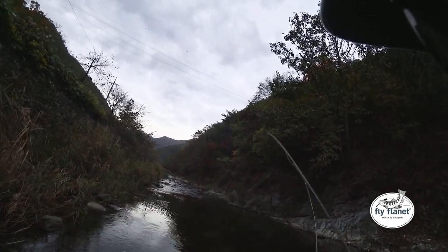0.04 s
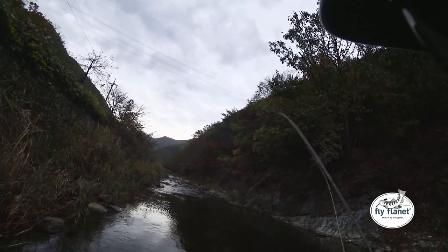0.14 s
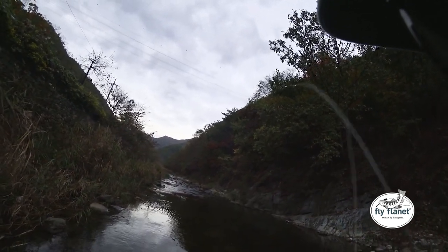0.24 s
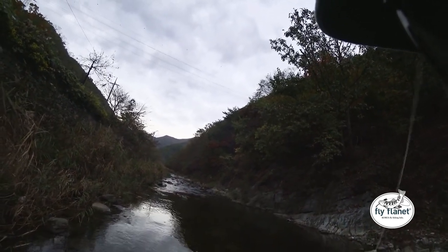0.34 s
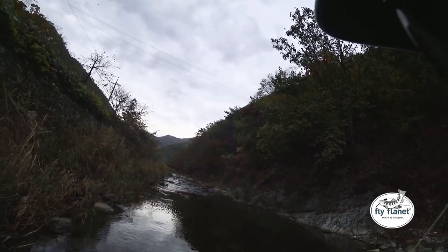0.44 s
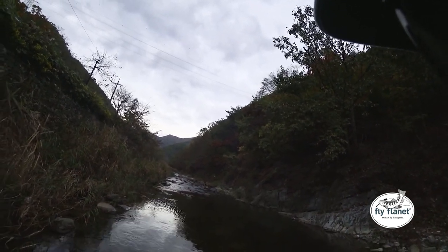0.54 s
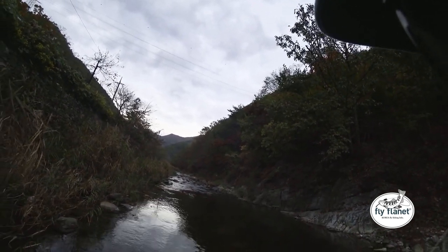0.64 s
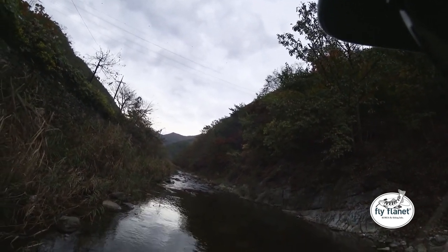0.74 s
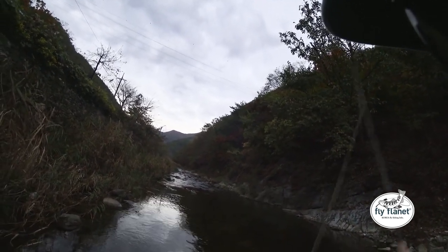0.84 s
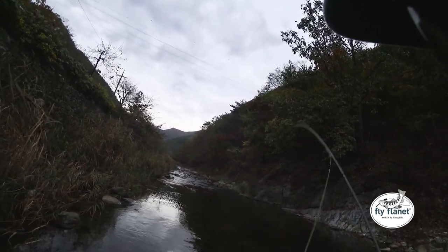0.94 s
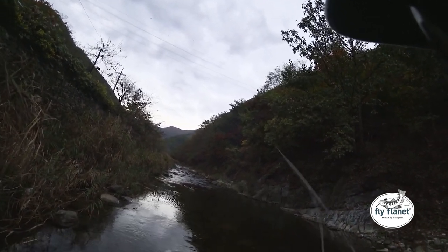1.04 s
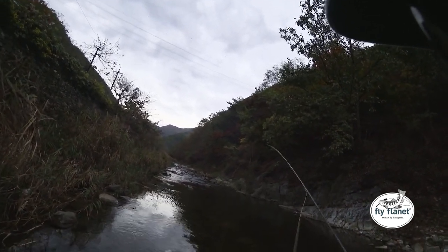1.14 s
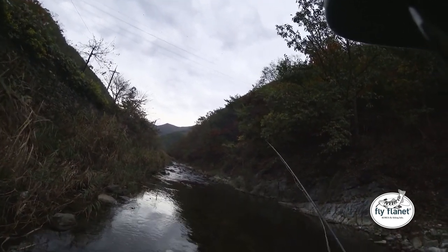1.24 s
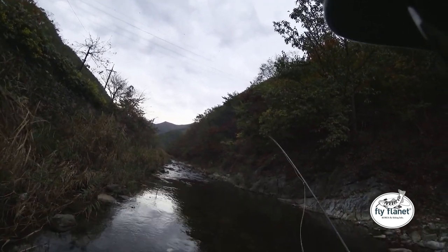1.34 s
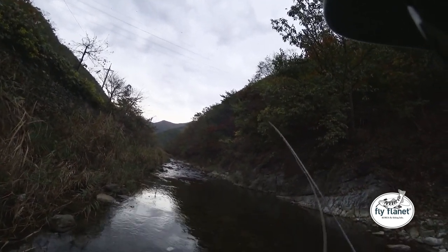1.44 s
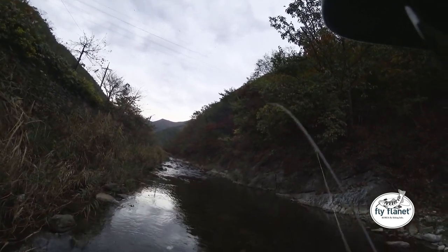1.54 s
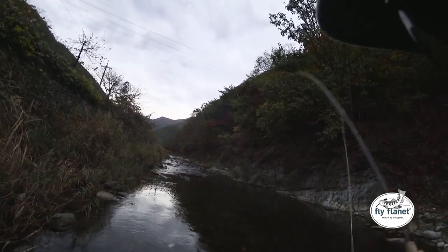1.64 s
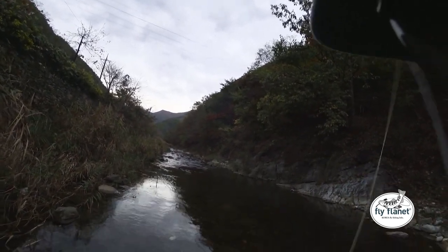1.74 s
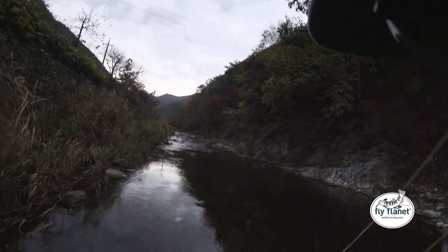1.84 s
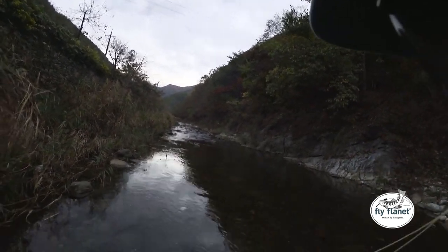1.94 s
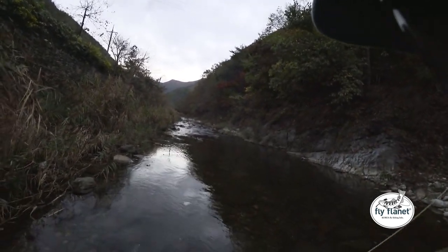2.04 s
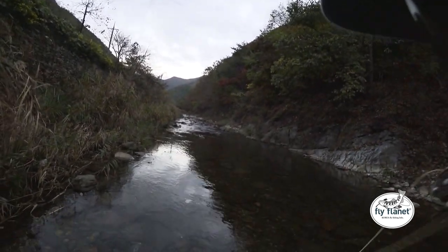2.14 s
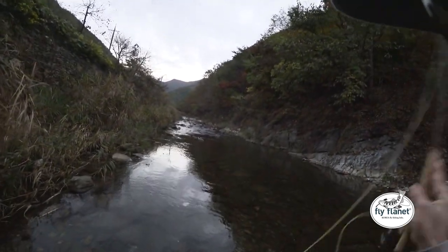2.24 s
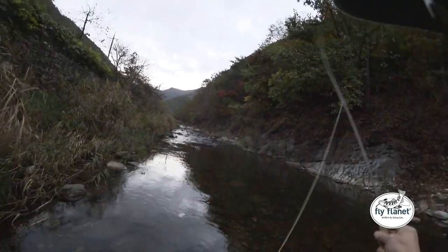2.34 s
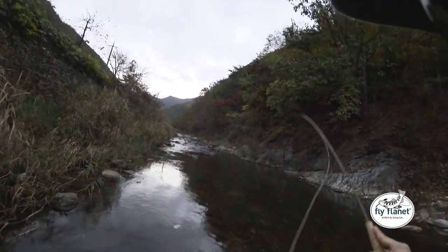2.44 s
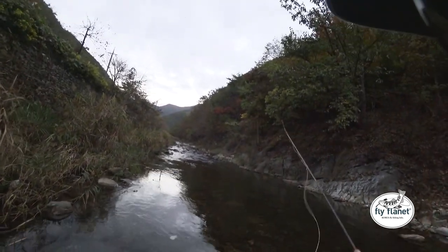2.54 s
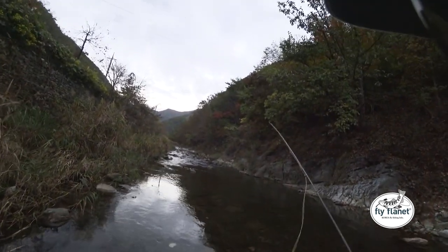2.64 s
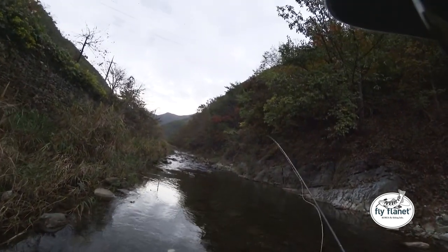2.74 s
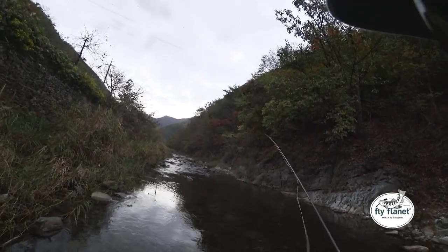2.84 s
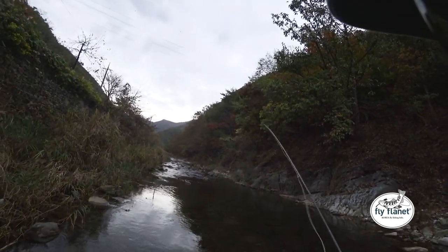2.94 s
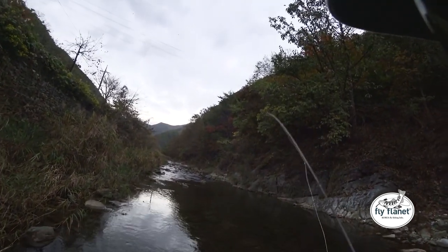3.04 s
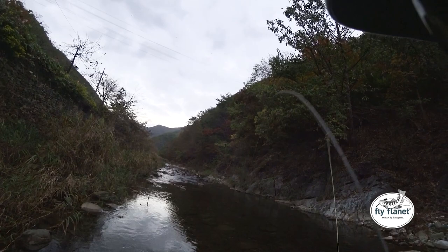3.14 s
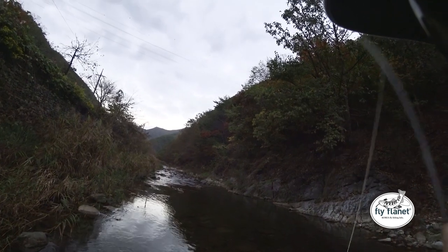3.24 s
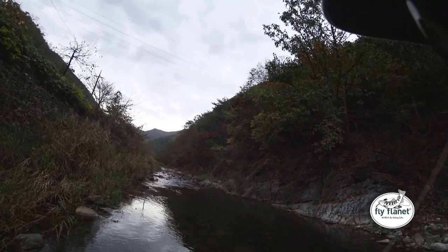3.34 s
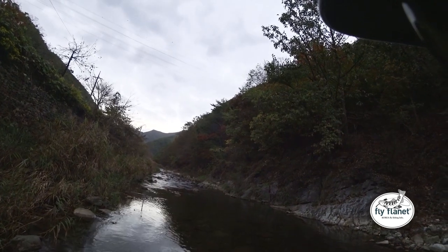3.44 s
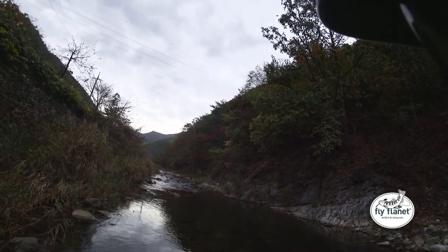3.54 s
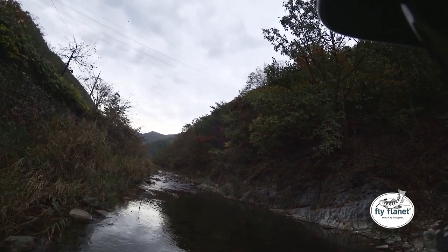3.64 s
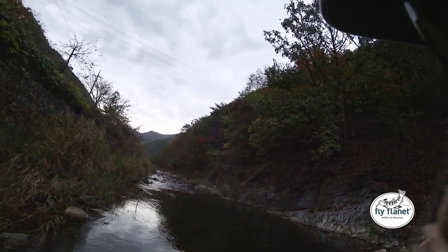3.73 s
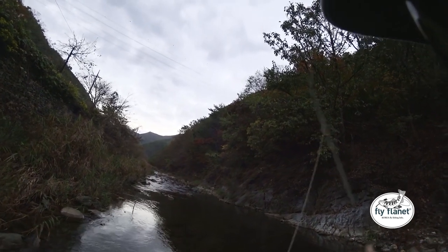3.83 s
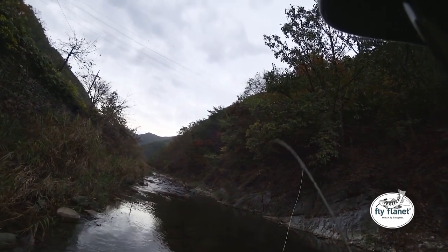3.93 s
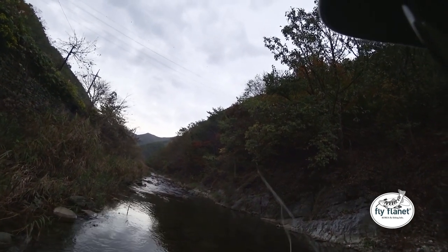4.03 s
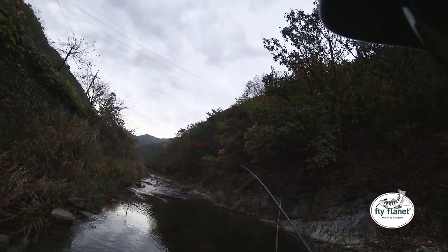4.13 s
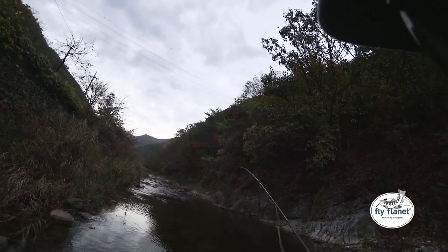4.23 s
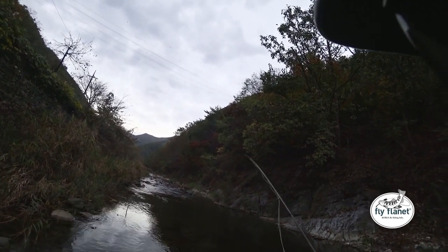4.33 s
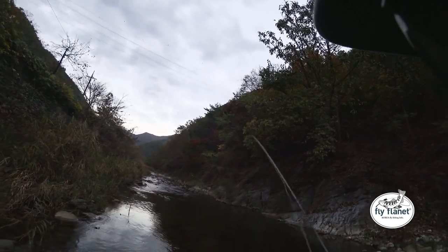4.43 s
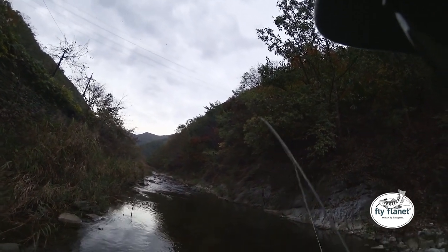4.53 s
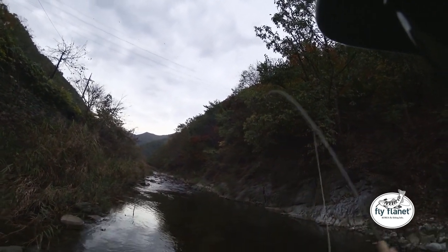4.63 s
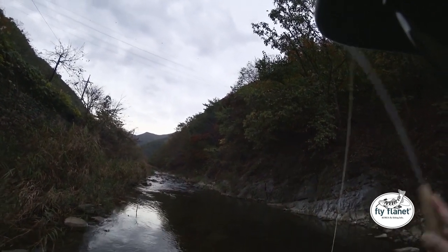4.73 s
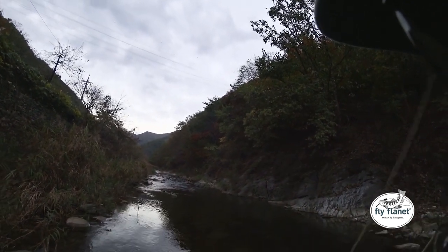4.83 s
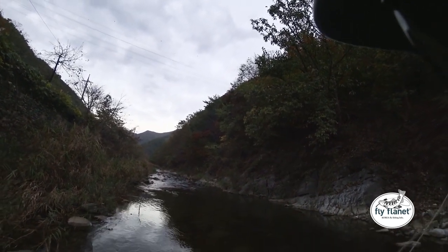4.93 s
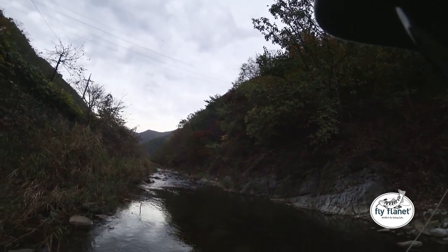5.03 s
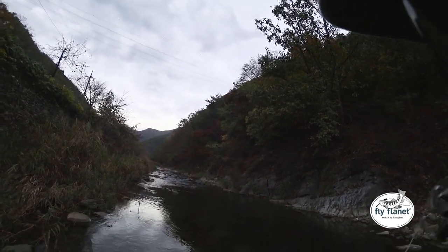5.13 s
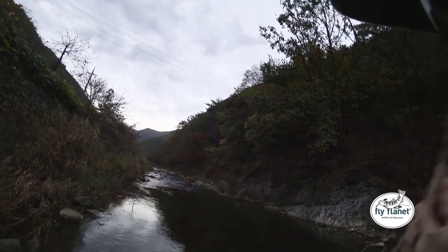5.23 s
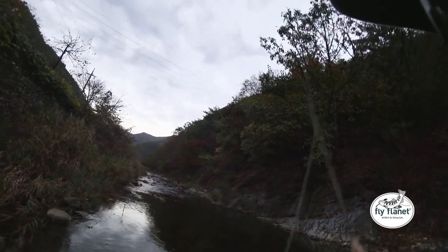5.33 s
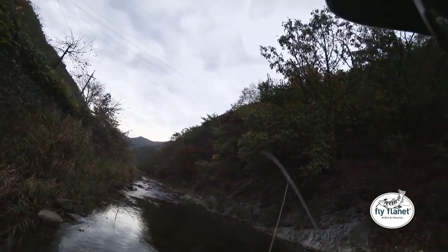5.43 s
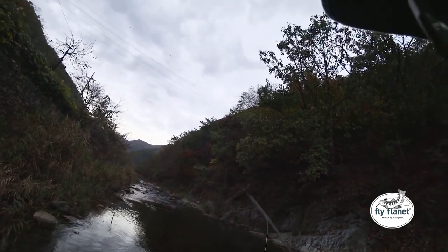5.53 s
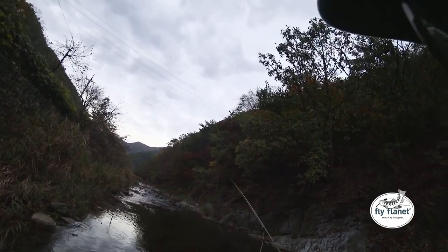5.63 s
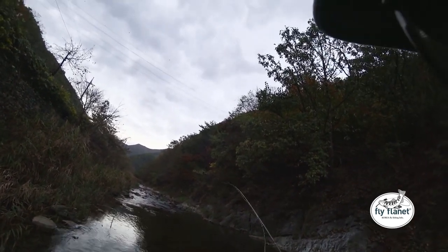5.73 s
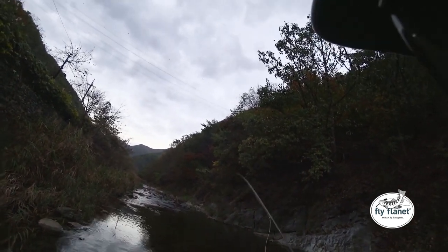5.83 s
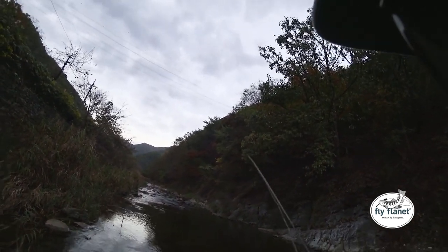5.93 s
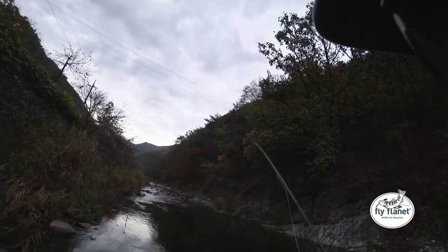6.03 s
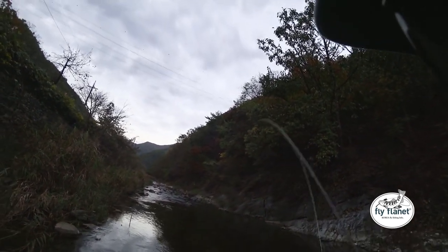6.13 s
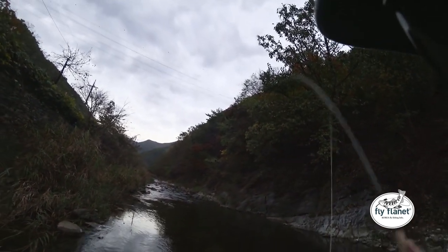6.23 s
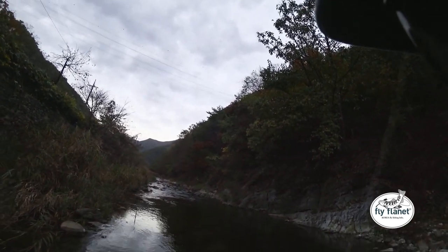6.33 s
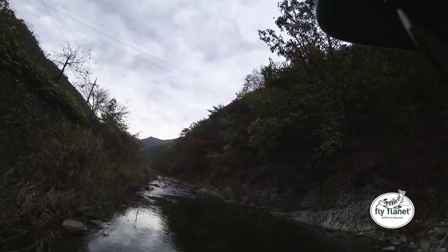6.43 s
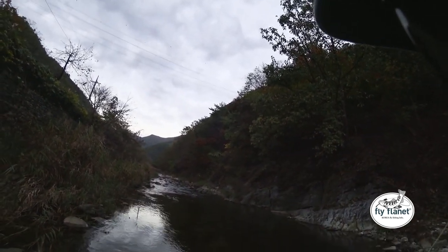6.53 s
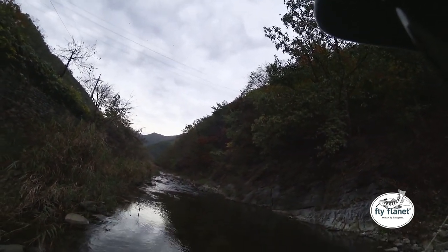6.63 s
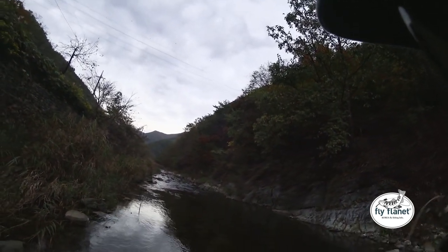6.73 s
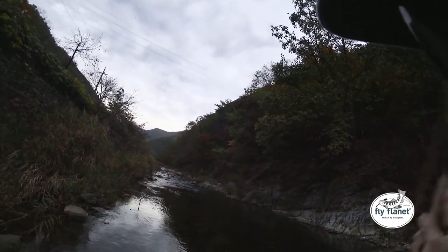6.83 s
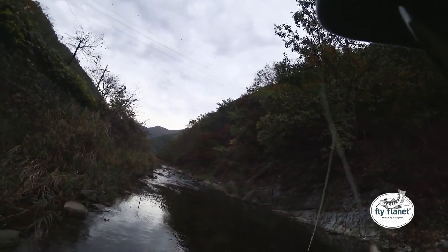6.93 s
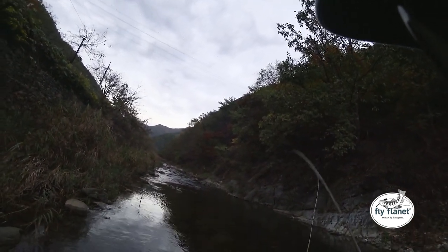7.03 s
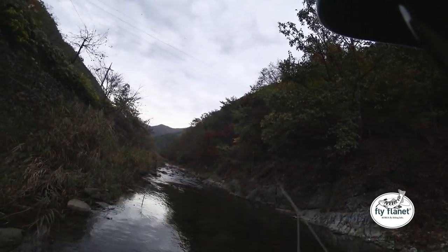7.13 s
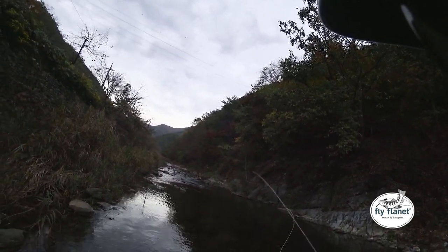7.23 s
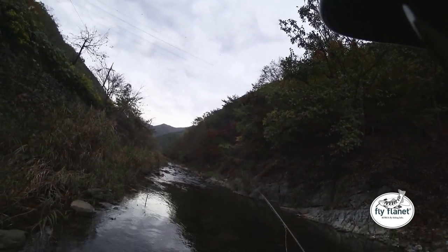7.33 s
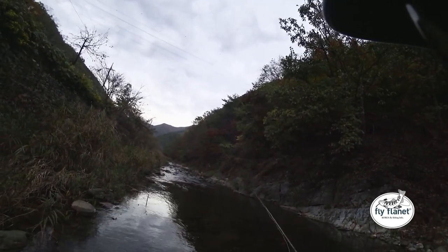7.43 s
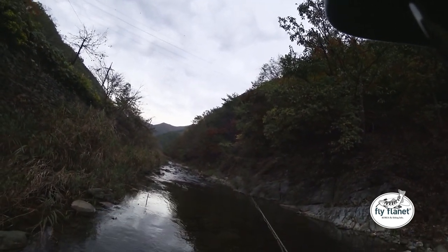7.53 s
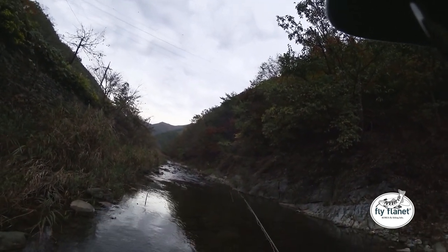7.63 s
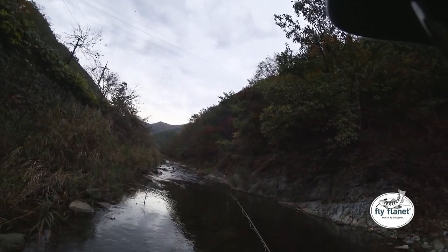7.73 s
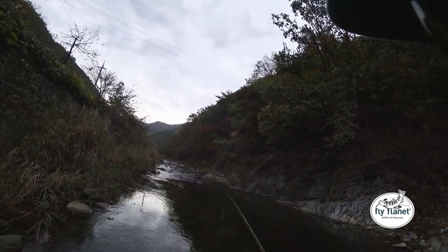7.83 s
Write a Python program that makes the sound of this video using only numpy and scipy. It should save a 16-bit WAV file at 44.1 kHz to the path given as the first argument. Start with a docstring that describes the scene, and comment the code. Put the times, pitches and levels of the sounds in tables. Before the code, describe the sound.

Five short ratcheting buzzes from a fly reel, each slowing into single clicks, over a shallow stream's steady rush and soft line hiss.

```python
"""A shallow stream rushes and bubbles while fishing line hisses through rod rings; then a fly reel buzzes.
An angler pulls line off the reel five times while casting: each pull spins the spool, whose pawl drops
once a ratchet tooth, and the buzz runs out in single clicks. The line also whistles as it sheds eddies
in the air and ticks on the rod. Stirred water gurgles with decaying sine bubbles; soft bumps are low noise."""
import sys
import numpy as np
from scipy import signal
from scipy.fft import rfft, irfft, next_fast_len
from scipy.io import wavfile

SR = 44100
rng = np.random.default_rng(int(sys.argv[2]) if len(sys.argv) > 2 else 0)


def to_wav(sig):
    """Store sig (one row per channel, or 1-D mono) as 16-bit WAV at the path in sys.argv[1].

    Samples outside -1..1 are clipped; the rate is SR.
    """
    pcm = np.clip(np.atleast_2d(sig), -1, 1) * 32767
    pcm = np.round(pcm).astype(np.int16)
    wavfile.write(sys.argv[1], SR, pcm.T)  # frames by channels


N = 347067
TIME = np.arange(N) / SR

# Levels in the tables are relative: each source's own level_db, where it has one, adds to them.
# spectrum of the stream's rush: frequency_hz, density_db (per Hz)
STREAM_SPECTRUM = [(25, -44), (70, -46), (160, -33.5), (250, -17), (350, -10), (550, -7), (1200, -3),
                   (1800, -7), (2700, -12), (4000, -12.5), (6000, -26.5), (8500, -18.5), (11000, -27)]
# left-right likeness of the rush: frequency_hz, likeness (1 = identical)
STREAM_LIKENESS = [(60, 0.29), (300, 0.84), (600, 0.77), (1200, 0.69), (2600, 0.44), (6000, 1),
                   (11000, 0.47)]
# line sliding through the rings, long on each forward cast, briefly on the back cast:
# middle_s, half_length_s, level_db
LINE_SLIDES = [(0.08, 0.21, -54), (1.13, 0.31, -46.5), (1.75, 0.18, -49.5), (2.6, 0.29, -45),
               (4.15, 0.3, -45.5), (5.61, 0.38, -47.5), (6.2, 0.16, -56), (7.18, 0.37, -47),
               (7.82, 0.054, -52)]
# spectrum of the sliding hiss: frequency_hz, level_db
SLIDE_SPECTRUM = [(1200, -36.5), (1900, -5.5), (3000, -16.5), (4000, -9), (5100, -4.5), (5700, -0.5),
                  (7000, -2), (8000, -9.5), (9000, -17.5), (9800, -13), (11000, -18.5)]
# soft bumps of the body moving: middle_s, half_length_s, level_db
BODY_BUMPS = [(0.28, 0.032, -79), (2.17, 0.14, -68.5), (2.57, 0.18, -63), (3.1, 0.049, -77),
              (4.13, 0.066, -78), (4.68, 0.037, -70), (5.16, 0.17, -79), (6.63, 0.05, -75),
              (7.03, 0.033, -65)]
# pulls on the line: start_s, fastest_s, end_s, first_teeth_per_s, top_teeth_per_s, coasting_teeth_per_s,
# tug_abruptness (exponent), slowing_s, driven_click_db, coasting_click_db, knock_db,
# driven_chatter_hz, coasting_chatter_hz
LINE_PULLS = [(0.301, 0.432, 0.5864, 163, 346, 91, 2.73, 0.13, -14, -12.5, 4, 5650, 6300),
              (1.744, 1.87, 2.0151, 180, 375, 80, 3.2, 0.12, -12, -16, 4.5, 6450, 4800),
              (3.176, 3.35, 3.5647, 157, 342, 67, 2.13, 0.173, -13.5, -10.5, 2.5, 5920, 6900),
              (4.6674, 4.836, 5.0031, 139, 359, 94, 1.25, 0.141, -12.5, -10.5, 4, 6342, 4370),
              (6.173, 6.38, 6.5952, 98, 333, 109.5, 1.52, 0.16, -12.5, -13.5, 4.5, 6120, 8583)]
# single teeth as the spool creeps: time_s, click_db
LONE_TEETH = [(0.599, -13), (0.6155, -14.5), (0.6446, -13), (2.0285, -13), (2.0443, -13), (2.0627, -15.5),
              (2.0933, -14.5), (3.0645, -20), (3.0795, -19), (3.0934, -18.5), (3.1093, -21), (3.1411, -18),
              (3.5751, -11), (3.5884, -9), (3.6063, -10.5), (5.0158, -14), (5.029, -7), (5.0428, -11.5),
              (5.0565, -11), (5.071, -10), (5.0901, -14), (5.1392, -10.5), (6.6045, -14), (6.6161, -11),
              (6.6302, -13.5), (6.6567, -13)]
# broad spectrum of the reel: frequency_hz, level_db
REEL_SPECTRUM = [(200, -72), (450, -30), (1000, -14.5), (1600, -5), (1850, -11), (2600, -6), (3000, -11.5),
                 (3350, -18.5), (3700, -8), (4200, -7.5), (5000, -2.5), (6300, -3.5), (8400, 0),
                 (11000, -5)]
# ringing of spool and frame: frequency_hz, width_hz, level_db
REEL_MODES = [(2453, 100, -2), (3703, 79, 3), (4590, 250, -5.5), (5410, 49, 5.5), (6270, 190, -7.5),
              (9600, 330, 2.5)]
# the reel is held to the left: frequency_hz, right_ear_level_db
REEL_SHADOW = [(500, 4), (1200, -10.5), (2200, -5), (4000, -9.5), (7000, -7), (11000, -6)]
# phase between the reel's two sides: frequency_hz, right_lead_rad
EAR_PHASE = [(300, -0.9), (1400, 0.79), (3500, -0.63), (6500, 0.26), (11000, -1.68)]
# water stirred nearby: middle_s, half_length_s, level_db
SLOSHES = [(0.59, 0.37, -46), (0.87, 0.19, -48), (1.89, 0.13, -42), (2.21, 0.21, -44), (2.56, 0.37, -47.5),
           (6.18, 0.085, -48), (6.43, 0.22, -44)]
# big bubbles: start_s, pitch_hz, level_db
BIG_BUBBLES = [(0.65, 780, -34.5), (0.925, 463, -33.5), (0.94, 563, -31.5), (1.845, 594, -31),
               (1.905, 560, -32), (2.15, 796, -32), (2.222, 847, -35), (2.505, 537, -36), (2.6, 590, -35.5),
               (6.325, 390, -43)]
# line swishing through the air: start_s, length_s, first_hz, last_hz, level_db,
# blur_width (share of last_hz), octave_db
SWISHES = [(0.658, 0.26, 3430, 4890, -56.5, 0.18, -18), (4.567, 0.12, 3120, 4030, -46, 0.024, -10),
           (5.69, 0.37, 3440, 5190, -53, 0.12, -31), (6.678, 0.25, 3190, 5150, -45, 0.12, -26),
           (7.67, 0.19, 2955, 5750, -45.5, 0.08, -27), (7.81, 0.13, 3670, 4620, -42, 0.093, -18)]
# line tapping the rod: start_s, peak_db
LINE_TAPS = [(1.1772, -32), (1.479, -27), (1.6644, -32), (2.6777, -27.5), (2.709, -24), (3.743, -29),
             (3.812, -34), (4.273, -27), (5.7137, -28.5)]

WOBBLE_S, WOBBLES_PER_S = 0.00005, 25  # uneven spool: s early or late, changes per s
CHATTER_WANDER, WANDERS_PER_S = 0.093, 4.7  # chatter pitch strays: share, changes per s
KNOCK_RISE_DB, COASTING_KNOCK_DB = 6, 1  # knock grows while spinning up, and again while coasting
CUTOFF_HZ = 11100


def from_db(db):
    """Amplitude gain is ten to the power of decibels over twenty."""
    return 10 ** (np.asarray(db) / 20)


def rms_one(x):
    """Normalisation by mean power: scale to unit rms."""
    return x / np.sqrt(np.mean(x ** 2) + 1e-20)


def at_hz(points, hz):
    """Linear interpolation on a logarithmic frequency axis."""
    frequency, value = np.transpose(points)
    return np.interp(np.log(hz + 1), np.log(frequency), value)


def colour(x, points, size=4096):
    """Minimum-phase filtering: the Hilbert transform of log gain gives the phase of a causal response."""
    hz = np.abs(np.fft.fftfreq(size, 1 / SR))
    log_gain = np.log(from_db(at_hz(points, hz)))
    response = np.fft.ifft(np.exp(np.conj(signal.hilbert(log_gain)))).real
    return signal.fftconvolve(np.atleast_2d(x), response[None, :size // 2], axes=1)[:, :N]


def band(x, low_hz, high_hz):
    """Band-pass filtering with a maximally flat (Butterworth) response."""
    sections = signal.butter(2, [low_hz, high_hz], "band", fs=SR, output="sos")
    return signal.sosfilt(sections, x + 1e-18)


def resonance(x, hz, width):
    """Damped resonance: a pole pair whose radius sets the bandwidth, with gain 1 at the peak."""
    radius = np.exp(-np.pi * width / SR)
    zeros = np.array([1, 0, -1]) * (1 - radius * radius) / 2
    poles = [1, -2 * radius * np.cos(2 * np.pi * hz / SR), radius * radius]
    return signal.lfilter(zeros, poles, x + 1e-18)


def drift(rate, size=N):
    """Low-pass random process of rms 1 that changes about `rate` times a second."""
    padded = next_fast_len(size, True)
    hz = np.arange(padded // 2 + 1) * SR / padded
    spectrum = rfft(rng.standard_normal(padded)) / (1 + (hz / rate) ** 2)
    return rms_one(irfft(spectrum, padded)[:size])


def spread(pair, alike, pan_db=0):
    """Stereo correlation: sum and difference of unrelated signals set the likeness of left and right."""
    alike = np.clip(alike, -1, 1)
    middle = np.sqrt(1 + alike) * pair[0]
    side = np.sqrt(1 - alike) * pair[1] * np.array([[1], [-1]])
    return (middle + side) / np.sqrt(2) * from_db([[pan_db / 2], [-pan_db / 2]])


def add(track, s, sound):
    """Superposition: mix a sound in at time s."""
    i = int(np.clip(round(s * SR), 0, N))
    track[..., i:i + sound.shape[-1]] += sound[..., :N - i]


def swells(rows):
    """Addition of powers: symmetric Gaussian swells combine into one amplitude envelope."""
    powers = [(from_db(db) * np.exp(-((TIME - s) / half) ** 2)) ** 2 for s, half, db in rows]
    return np.sqrt(sum(powers))


def bubble(hz, cycles=14, rise=0.13):
    """Bubble resonance: a decaying sine that rises in pitch as the bubble nears the surface."""
    u = np.linspace(0, 1, int(2 * cycles / hz * SR))
    tone = np.sin(4 * np.pi * cycles * (u + rise * u * u))
    return tone * np.exp(-6 * u) * (1 - np.exp(-40 * u))


def bubbling(low_hz, high_hz, size_db, count):
    """Superposition of many bubbles of random pitch, size, side and time, scaled to unit rms."""
    out = np.zeros((2, N))
    for when, pitch, size, side in rng.random((count, 4)):
        pan = np.array([[0.5 + side], [1.5 - side]])
        gain = from_db(size_db * min(-np.log(1 - size), 4)) * pan
        add(out, when * N / SR, gain * bubble(low_hz * (high_hz / low_hz) ** pitch))
    return rms_one(out)


def stream(level_db=-50, bubbles_db=-60, surge_db=1.0):
    """Turbulence noise of a riffle: a smooth far rush, with the resonances of nearer bubbles in it."""
    hz = np.arange(N // 2 + 1) * SR / N
    rush = irfft(spread(rfft(rng.standard_normal((2, N))), at_hz(STREAM_LIKENESS, hz)), N)
    rush = rms_one(colour(rush, STREAM_SPECTRUM)) * from_db(level_db + surge_db * drift(39))
    return rush + from_db(bubbles_db) * bubbling(465, 2310, size_db=1.5, count=2500)


def line_hiss(grain_db=2, flutter_db=1.14, resting_db=-62):
    """Friction noise: wet line rubs on the rings, fluttering and catching finely as it goes."""
    noise = spread(rng.standard_normal((2, N)), alike=0.71, pan_db=4.5)
    hiss = rms_one(colour(noise, SLIDE_SPECTRUM))
    sliding = np.hypot(swells(LINE_SLIDES), from_db(resting_db))
    return hiss * sliding * from_db(grain_db * drift(180) + flutter_db * drift(9.1))


def bumps(rumble_db=-99, waver_db=4):
    """Low-frequency noise bursts as the angler shifts, over a very faint uneven rumble."""
    thud_noise = spread(rng.standard_normal((2, N)), alike=0.46)
    thuds = swells(BODY_BUMPS) * rms_one(band(thud_noise, 69.9, 262.6))
    rumble = rms_one(band(spread(rng.standard_normal((2, N)), alike=0.44), 35, 160))
    return thuds + rumble * from_db(rumble_db + waver_db * drift(14))


def teeth(pull, lone):
    """Rotation under tug and drag: the pawl drops once a tooth (time_s, click_db, knock_db, chatter_hz)."""
    (start, fastest, end, first, top, coasting, abruptness, slowing_s,
     driven_db, coasting_db, knock_db, driven_hz, coasting_hz) = pull
    t = np.arange(start, end, 1 / SR)
    tug = np.clip((t - start) / (fastest - start), 0, 1)
    momentum = np.exp(-(np.maximum(t - fastest, 0) / slowing_s) ** 2)
    speeding_up = top - (top - first) * (1 - tug) ** abruptness
    slowing_down = np.maximum(top * momentum, coasting)
    speed = np.where(t < fastest, speeding_up, slowing_down)
    # each whole tooth turned gives one drop
    turned = np.cumsum(speed) / SR
    wobble = WOBBLE_S * drift(WOBBLES_PER_S, size=SR)[:len(t)]
    tooth_count = np.linspace(0, turned[-1], round(turned[-1]) + 1)
    spun = np.interp(tooth_count, turned, t + wobble)
    # as the line goes slack, the clicks take on their coasting strength and pitch
    slack = ((1 - momentum) / (1 - momentum[-1])) ** 4
    spun_db = driven_db + (coasting_db - driven_db) * np.interp(spun, t, slack)
    s, db = np.transpose(sorted(list(zip(spun, spun_db)) + lone))
    slack = np.interp(s, t, slack)
    knock = knock_db - KNOCK_RISE_DB * (1 - np.interp(s, t, tug) ** 2) + COASTING_KNOCK_DB * slack
    chatter_hz = driven_hz + (coasting_hz - driven_hz) * slack
    stray = drift(WANDERS_PER_S, size=SR)[((s - s[0]) * SR).astype(int)]
    return np.column_stack([s, db, knock, chatter_hz * np.exp(CHATTER_WANDER * stray)])


def pawl_drops(lone_db):
    """Ratchet kinematics: all drops in order, each lone tooth coloured by the nearest pull."""
    fastest = np.array(LINE_PULLS)[:, 1]
    drops = []
    for k, pull in enumerate(LINE_PULLS):
        lone = [(s, db + lone_db) for s, db in LONE_TEETH if np.argmin(abs(fastest - s)) == k]
        drops.append(teeth(pull, lone))
    return np.vstack(drops)


def pawl(drops, chatter_s=0.0026, tail_s=0.0091, tail_db=-15, ping_db=2, ping_width=1100,
         uneven_db=0.74, alike=0.8, size=512):
    """Impact noise: each drop is a short metal chatter whose pattern changes slowly between teeth."""
    forget_s, fresh, jitter_s = 0.06, 0.27, 0.000012  # fresh: share of new noise in each drop
    t = np.arange(size) / SR
    shape = np.exp(-((t - chatter_s / 2) / (chatter_s / 2)) ** 2) + from_db(tail_db) * np.exp(-t / tail_s)
    snaps, knocks = np.zeros((2, 2, N))
    pattern, before = rng.standard_normal((2, size)), 0
    for s, db, knock_db, ping_hz in drops:
        memory, before = np.exp(-abs(s - before) / forget_s), s
        pattern = memory * pattern + np.sqrt(1 - memory ** 2) * rng.standard_normal((2, size))
        noise = pattern + fresh * rng.standard_normal((2, size))
        chatter = spread(shape * noise, alike)
        # the pawl's tip pings at a pitch set by how it lands
        chatter = chatter + from_db(ping_db) * resonance(chatter, ping_hz, ping_width)
        # the noise's chance energy is evened out, leaving a small spread in strength
        strength = from_db(db + uneven_db * rng.standard_normal())
        chatter = rms_one(chatter) * np.sqrt(np.mean(shape ** 2)) * strength
        landing = s + jitter_s * rng.standard_normal()
        add(snaps, landing, chatter)
        add(knocks, landing, chatter * from_db(knock_db))
    # the knock band takes its own level
    return snaps + band(knocks - snaps, 1820, 4030)


def reel(level_db=-1.5, lone_db=-1):
    """Modal resonance: the pawl's drops ring through spool and frame; the right side lies in shadow."""
    blows = pawl(pawl_drops(lone_db))
    rung = blows + sum(from_db(db) * resonance(blows, hz, width) for hz, width, db in REEL_MODES)
    left, right = colour(rung, REEL_SPECTRUM)
    hz = np.arange(N // 2 + 1) * SR / N
    right = irfft(rfft(right) * np.exp(1j * at_hz(EAR_PHASE, hz)), N)
    return from_db(level_db) * np.vstack([left, colour(right, REEL_SHADOW)])


def slosh(level_db=-1):
    """Bubble resonance in stirred water: swelling gurgles with a few big bubbles."""
    gurgle = rms_one(band(bubbling(335.3, 1706, size_db=3, count=4000), 577, 1850))
    out = gurgle * from_db(level_db) * swells(SLOSHES)
    for s, hz, db in BIG_BUBBLES:
        add(out, s, from_db(db) * bubble(hz, cycles=19.5))
    return out


def line_swishes(ease=2.2, pan_db=2):
    """Vortex shedding: eddies sing higher as the line speeds up; its unequal stretches blur the tone."""
    out = np.zeros(N)
    for s, length, first_hz, last_hz, db, width, octave_db in SWISHES:
        u = np.linspace(0, 1, int(length * SR))
        pitch_hz = last_hz + (first_hz - last_hz) * (1 - u) ** ease
        phase = 2 * np.pi * np.cumsum(pitch_hz) / SR
        blur = drift(width * last_hz, size=SR) + 1j * drift(width * last_hz, size=SR)
        blur = blur[:len(u)] / np.sqrt(2)
        octave = from_db(octave_db) * blur ** 2 * np.exp(2j * phase)
        tone = blur * np.exp(1j * phase) + octave
        add(out, s, from_db(db) * np.sqrt(2) * tone.real * np.sin(np.pi * u))
    return out * from_db([[pan_db / 2], [-pan_db / 2]])


def line_taps(level_db=-6, decay_s=0.003, size=600):
    """Impact noise: light, exponentially decaying ticks of line on the rod."""
    out = np.zeros((2, N))
    for s, db in LINE_TAPS:
        tick = rng.standard_normal((2, size)) * np.exp(-np.arange(size) / SR / decay_s)
        add(out, s, from_db(db + level_db) * spread(tick, alike=0.6, pan_db=4))
    return band(out, 2500, 9600)


def scene():
    """Superposition of sources: reel and line close by on the left, water all around."""
    return stream() + line_hiss() + bumps() + reel() + slosh() + line_swishes() + line_taps()


def record(dry):
    """Low-pass filtering: an elliptic response cuts the top steeply."""
    return signal.sosfilt(signal.ellip(12, 0.2, 75, CUTOFF_HZ, fs=SR, output="sos"), dry)


dry = scene()
out = record(dry)
to_wav(out)
```